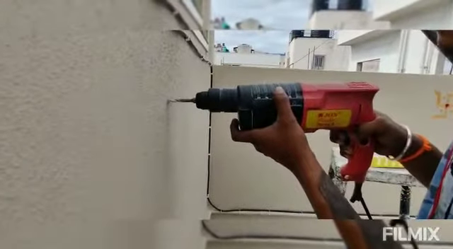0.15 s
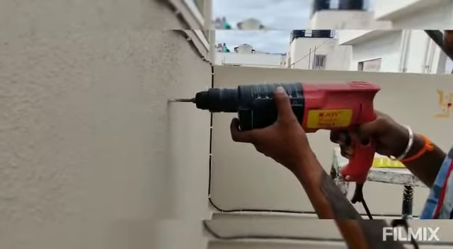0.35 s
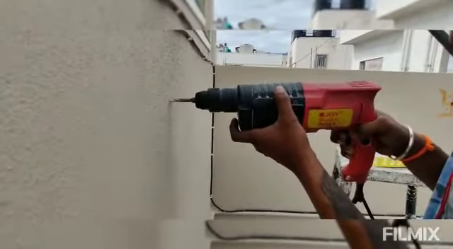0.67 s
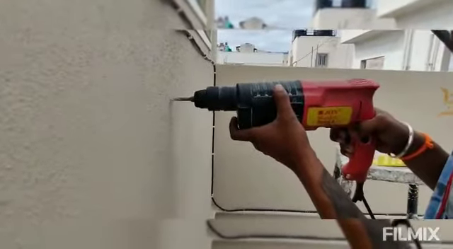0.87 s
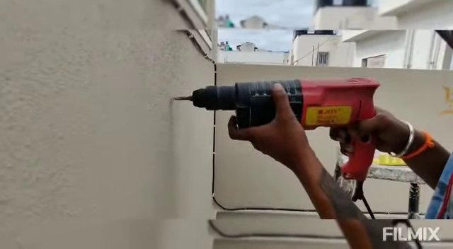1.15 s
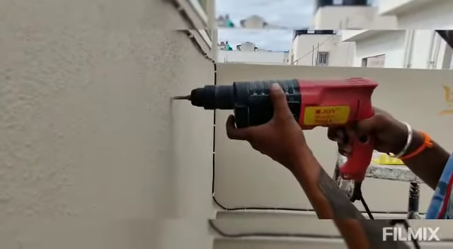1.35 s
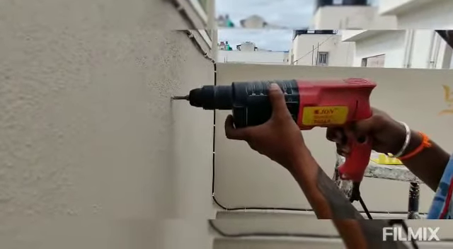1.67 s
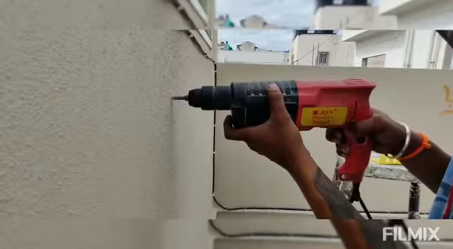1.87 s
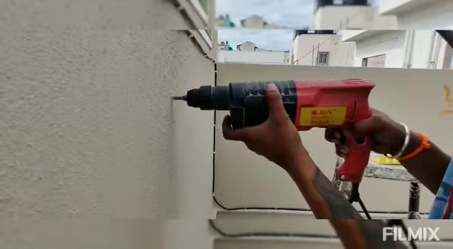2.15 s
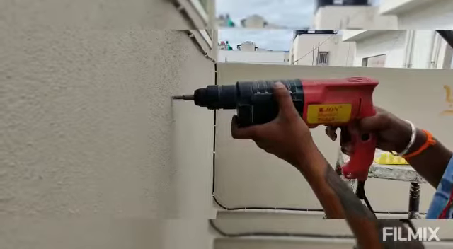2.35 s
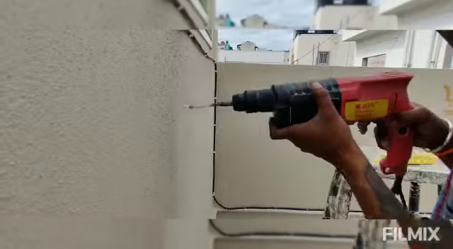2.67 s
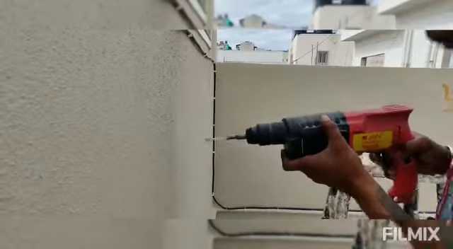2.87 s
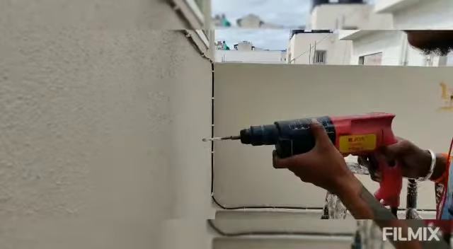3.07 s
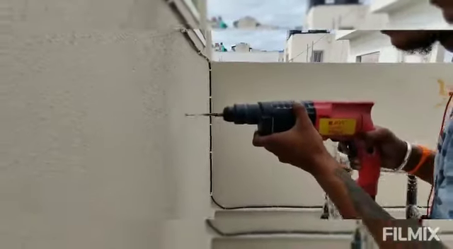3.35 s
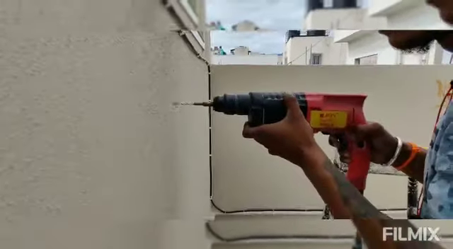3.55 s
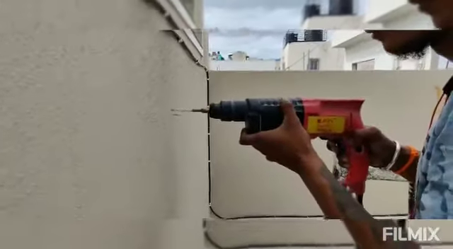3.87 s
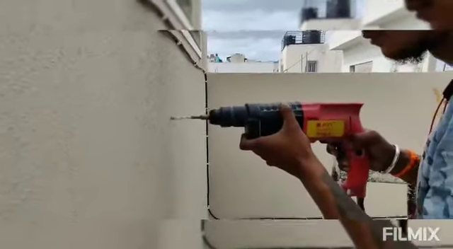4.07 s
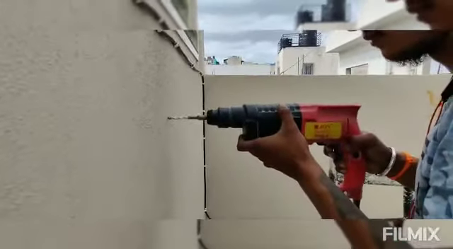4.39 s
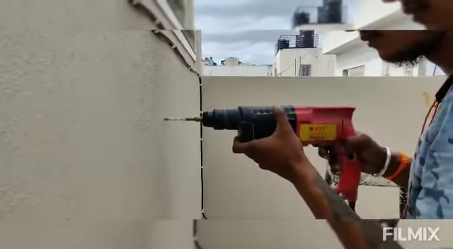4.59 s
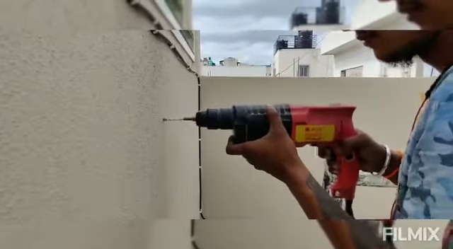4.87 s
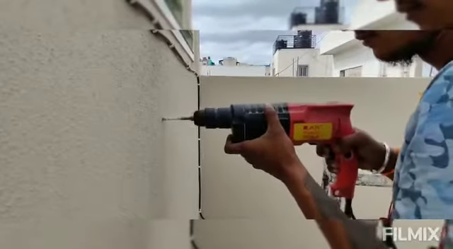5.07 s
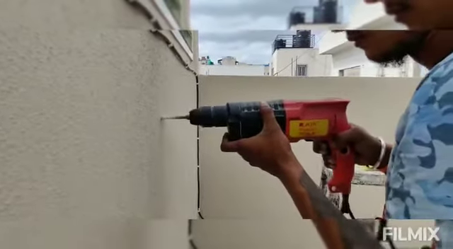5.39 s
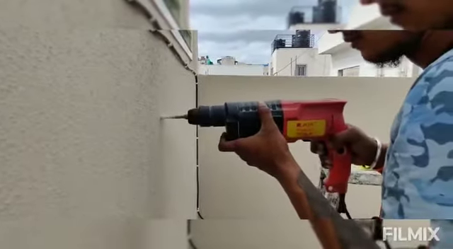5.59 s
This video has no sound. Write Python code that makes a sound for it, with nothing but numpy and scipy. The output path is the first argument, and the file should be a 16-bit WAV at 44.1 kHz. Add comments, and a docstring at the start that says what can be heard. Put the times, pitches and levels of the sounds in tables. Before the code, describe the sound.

A hammer drill hammers loudly into a masonry wall, pulls free and whines down to a stop, then revs up and drills again.

```python
"""A rotary hammer drill bores into a plastered masonry wall, between hard walls close to the microphone.
Blow impulses excite tool resonances, over gear tones, gear rasp and recoil; light air rumbles as filtered noise.
The tool is let go and pulled out; its whine glides down, the loose bit clinks, slack gears knock and it stops.
Then the trigger taps, the gears race up and a second hole begins.
One shaft speed times the blows, whine and slack knocks, and sets the loudness of the gears."""
import sys
import numpy as np
from scipy import signal
from scipy.fft import rfft, irfft, next_fast_len
from scipy.io import wavfile
from scipy.ndimage import uniform_filter1d, map_coordinates

SR = 44100
rng = np.random.default_rng(int(sys.argv[2]) if len(sys.argv) > 2 else 0)


def to_wav(s):
    """Save 16-bit WAV."""
    ch = np.atleast_2d(s).T  # columns
    pcm = np.round(np.clip(ch, -1, 1) * 32767)  # PCM
    wavfile.write(sys.argv[1], SR, pcm.astype(np.int16))


N = 252693
TIME = np.arange(N) / SR  # s

# the bit is on the wall (from s, until s, moment of one blow s)
DEEP_HOLE, FRESH_HOLE = (-1, 2.27, 2.2535), (4.745, 6, 4.7565)
FULL_RATE = 71  # reference shaft speed, turns (and blows) per second
STOP_S = 4.5  # the coast ends


def amp(db):
    """Level law: decibels to amplitude gain."""
    return 10 ** (np.asarray(db) / 20)


def unit(x):
    """Normalization: scale to rms 1."""
    return x / np.sqrt(np.mean(x ** 2) + 1e-20)


def along(points, hz):
    """Logarithmic interpolation: (f/Hz, value) points joined on a log-frequency axis."""
    f, v = np.transpose(points)
    return np.interp(np.log(hz + 1), np.log(f + 1), v)


def curves(rows):
    """Linear interpolation: one curve over time for each column after the time."""
    s, *columns = np.transpose(rows)
    return [np.interp(TIME, s, column) for column in columns]


def wobble(rate):
    """Band-limited chance: a smooth random curve with rate knots a second."""
    knots = rng.standard_normal(int(N * rate / SR) + 4)
    return map_coordinates(knots, [TIME * rate])


def swells(rows):
    """Gaussian envelopes: bell-shaped level changes in dB from rows of t/s, half length/s, change/dB."""
    return sum(db * np.exp(-((TIME - s) / length) ** 2) for s, length, db in rows)


def filtered(x, response):
    """Linear filtering: the spectrum of x times a response of frequency."""
    m = next_fast_len(N + 8192)
    return irfft(rfft(x, m) * response(np.fft.rfftfreq(m, 1 / SR)), m)[..., :N]


def below(hz, edge_hz, order=8):
    """Low-pass gain of Butterworth form."""
    return 1 / np.sqrt(1 + (hz / edge_hz) ** order)


def above(hz, edge_hz, order=8):
    """High-pass gain that complements the low-pass in power."""
    return np.sqrt(1 - below(hz, edge_hz, order=order) ** 2)


def noise():
    """Two independent white noises, for mid and side."""
    return rng.standard_normal((2, N))


def fade(t60):
    """Exponential decay: 60 dB in t60 seconds, cut after a quarter second."""
    return amp(-60 * TIME[:SR // 4] / t60)


def ring(x, response):
    """Superposition: convolve each row with an impulse response."""
    return signal.fftconvolve(np.atleast_2d(x), np.atleast_2d(response), axes=1)[:, :N]


def speed():
    """Drag law: turns per second when driven, coasting as a power of the time left, and driven again."""
    # first hole and the early part of the run-down: t/s, speed/turns per second
    first_run = [(0, 63.86), (.14, 68.52), (.35, 70.82), (1.16, 71.67), (1.3, 68.36), (1.58, 64.73),
                 (1.95, 63.66), (2.12, 64.15), (2.26, 51.76), (2.33, 50.8), (2.45, 47.8), (2.72, 40.6)]
    # new pull on the trigger: t/s, speed/turns per second
    second_run = [(4.698, 0), (4.75, 29.27), (4.82, 48.03), (4.92, 61.51), (5.02, 63.32), (5.2, 64.47),
                  (5.4, 70.03), (5.73, 71.21)]
    coast_power = 1.315  # friction and fan drag
    last_s = first_run[-1][0]
    left = np.clip((STOP_S - TIME) / (STOP_S - last_s), 0, 1)
    return curves(first_run)[0] * left ** coast_power + curves(second_run)[0]


def shaft():
    """Phase as the integral of speed: turns of the striker shaft so far."""
    return np.cumsum(speed()) / SR


def once_a_turn(moment):
    """Phase locking: samples at which the shaft stands as it does at the given moment."""
    turns = shaft()
    since = turns - np.interp(moment, TIME, turns)
    return np.flatnonzero(np.diff(np.floor(since)) > 0)


def octaves():
    """Logarithmic speed: octaves above the reference shaft speed."""
    return np.log2(speed() / FULL_RATE + 1e-6)


def strain():
    """Speed sag under load: how far the motor is below full speed, 0-1."""
    full_sag = 7  # turns per second lost under full strain
    return np.clip((FULL_RATE - speed()) / full_sag, 0, 1)


def surge():
    """Angular acceleration: how hard the motor is gaining speed, 0-1."""
    full_gain = 145  # turns per second, per second
    gain = np.gradient(speed()) * SR
    return uniform_filter1d(np.clip(gain / full_gain, 0, 1), SR // 50)


def turning():
    """Vanishing excitation: 1 while the gears run, falling to 0 as they creep to rest."""
    creep_rate = 4  # turns per second
    return np.clip(speed() / creep_rate, 0, 1) ** 2


def contact(*holes):
    """Contact coupling: how firmly the bit bears on the wall, 0-1."""
    bite_s = 0.024  # the bit takes hold or comes free
    return sum(np.clip(np.minimum(TIME - start, end - TIME) / bite_s + .5, 0, 1) for start, end, _ in holes)


def easing(hole):
    """Exponential approach: 1 as the bit meets or leaves the wall, towards 0 under full push."""
    ease_s = 0.12  # time constant of the hand leaning in and easing off
    start, end, _ = hole
    inside_s = np.maximum(np.minimum(TIME - start, end - TIME), 0)
    return np.exp(-inside_s / ease_s)


def walls(x, echo_db):
    """Comb filtering: nearby bare walls add weak copies delayed by 2 to 22 ms."""
    taps = np.zeros((2, SR // 20))
    for row in taps:
        delays = rng.integers(SR // 500, SR // 45, size=9)
        row[delays] = amp(echo_db) * rng.choice([-1, 1], size=9)
    return x + filtered(ring(x, taps), lambda hz: below(hz, 8200, order=6))


def radiate(force, colour, resonances, levels_db, share):
    """Forced resonance: colour a force by the tool's modes and set the level of three frequency registers."""
    def response(hz):
        lift = sum(db / (1 + (2 * (hz - centre) / width) ** 2) for centre, width, db in resonances)
        return amp(along(colour, hz) + lift)

    low, high = 1400, 7500  # register edges, Hz
    registers = [
        lambda hz: below(hz, low) ** 2,
        lambda hz: below(hz, high, order=20) ** 2 - below(hz, low) ** 2,
        lambda hz: above(hz, high, order=20) ** 2]
    sound = filtered(force, response)
    out = 0
    for register, db in zip(registers, levels_db):
        part = filtered(sound, register)
        active_rms = np.sqrt(np.average(part[0] ** 2, weights=share))
        out = out + amp(db) * part / active_rms
    return out * np.sqrt(share)


def hammer(hole, levels_db, eased_db, colour, resonances, knock_db, chatter_db, crack_db, repeat_hz, thud_db):
    """Impact excitation: one blow a turn; the wall knocks alike each time, the bit cracks and chatters afresh."""
    # brief level changes in the hammering: t/s, half length/s, change/dB
    lurches = [(.04, 0.018, -1.5), (.48, 0.075, -2.5), (1.0, 0.04, 0), (1.6, 0.018, -1.5),
               (1.69, 0.012, -4.5)]
    strain_levels_db = (-0.5, 0.15, 3.5)  # change under full strain: wall, housing, steel
    uneven_db, uneven_rate = .5, 24  # the masonry gives way unevenly: dB, changes per second
    jitter_s, sway_s = .00004, .00022  # blow timing: independent scatter, slow drift

    blow_at, turns = hole[-1], shaft()
    turns = turns - np.interp(blow_at, TIME, turns)
    at = once_a_turn(blow_at)
    chance = rng.standard_normal((len(at), 3))
    shift_s = chance[:, 0] * jitter_s + sway_s * wobble(14)[at]
    at = np.clip(at + np.round(shift_s * SR).astype(int), 0, N - 1)
    blow_db = 1.2 * chance[:, 1]
    blows = np.bincount(at, amp(blow_db), N)
    cracks = np.bincount(at, amp(blow_db + 2 * chance[:, 2]), N)

    # many close modes smear each blow in the same way
    smear = rfft(rng.standard_normal((2, SR // 4)) * (fade(0.013) + 0.24 * fade(0.11)))
    flattened = smear / np.abs(smear) ** .92
    knock = unit(ring(blows, irfft(flattened)))
    # the bit rebounds about three times between blows
    rebound = amp(1.2 * np.cos(2 * np.pi * 3 * turns) + 2.8 * wobble(300))
    chatter = noise() * ring(blows, fade(0.051) + fade(0.14)) * rebound
    chatter = unit(walls(chatter, echo_db=-14.0))
    crack = unit(noise() * ring(cracks, fade(.011) + .04 * fade(.06)))

    def chatter_colour(hz):
        return along([(200, 0.55), (700, 0.18), (1600, 0.88), (7000, 1), (10000, 0.57), (15000, 0.15)], hz)

    def crack_colour(hz):
        return along([(500, 0.24), (3000, 0.061), (7000, 0.25), (10000, 0.44), (14000, 0.89)], hz)

    force = amp(knock_db) * filtered(knock, lambda hz: below(hz, repeat_hz, order=3))
    force += amp(chatter_db) * filtered(chatter, chatter_colour)
    force += amp(crack_db) * filtered(crack, crack_colour)
    effort_db = uneven_db * wobble(uneven_rate) + swells(lurches)
    levels = [db + effort_db + strain_db * strain() + ease_db * easing(hole)
              for db, strain_db, ease_db in zip(levels_db, strain_levels_db, eased_db)]
    # strain changes the low thud of each blow
    thud = filtered(force, lambda hz: below(hz, 620) ** 2)
    force += (amp(thud_db * strain()) - 1) * thud
    force = filtered(force, lambda hz: above(hz, 207))
    return radiate(force, colour, resonances, levels, contact(hole))


def gears(mesh_db, shaft_db, grit_db, teeth_db, fan_db, fan_hz, fan_rate):
    """Amplitude modulation: gear, brush and fan noise pulses with the rotor and twice a turn with the shaft."""
    # colour of the free-running tool: f/Hz, level/dB per Hz
    colour = [(88, -54.5), (150, -23), (455, -13), (727, -4), (850, -11.5), (1050, -9), (2000, 8.5),
              (2210, 4.5), (3140, -2.5), (3740, -2), (5100, -5), (6700, -6), (8470, -21), (13500, -19.5),
              (15800, -29)]
    # its resonances: f/Hz, width/Hz, lift/dB
    resonances = [(674, 140, -1.5), (1060, 98, 5), (2090, 340, -7), (3187, 240, 6), (5800, 3600, -4.5),
                  (6760, 850, 6), (12000, 330, -7.5), (13800, 1300, 0)]
    # bass, middle, treble: level/dB at full speed, slope/dB per octave of speed,
    # change/dB while the bit is on the wall
    register_levels = [(-27, 11, -3), (-21, 7.5, -2.5), (-23.5, 10, -14)]

    turns, rate = shaft(), speed()
    rotor = 7 * turns
    pulse_db = mesh_db * np.cos(2 * np.pi * rotor) + shaft_db * np.cos(4 * np.pi * turns)
    rasp = amp(pulse_db + grit_db * wobble(700) + .7 * wobble(40))
    # the same small flaws of the pinion come round with every rotor turn
    flaws = rng.standard_normal((2, 64))
    teeth = np.array([map_coordinates(row, [rotor % 1 * len(row)], mode="grid-wrap") for row in flaws])
    teeth = amp(teeth_db + 4.6 * wobble(20)) * filtered(teeth, lambda hz: above(hz, 1580, order=4))
    # the cooling air in the vents weakens steeply below fan_rate turns per second
    vents = filtered(noise(), lambda hz: above(hz, fan_hz * 0.77, order=14) * below(hz, fan_hz * 1.13, order=20))
    fan = amp(fan_db) * np.clip(rate / fan_rate, 0, 1) ** 4 * vents
    force = walls((noise() + fan) * rasp + teeth, echo_db=-19.5)
    force = filtered(force, lambda hz: above(hz, 210))
    # the on-wall change is held back while the motor gains speed
    on_wall = contact(DEEP_HOLE, FRESH_HOLE) * (1 - surge())
    levels = [db + slope_db * octaves() + wall_db * on_wall for db, slope_db, wall_db in register_levels]
    return radiate(force, colour, resonances, levels, turning())


def gearcase(x):
    """Modal superposition: a force heard through resonances of the gear case, alternating in sign."""
    # modes: f/Hz, width/Hz, level/dB
    modes = [(1128, 150, -2.5), (1520, 190, -5), (1780, 170, -1), (2110, 200, 2), (2480, 240, -2),
             (3230, 200, -6)]

    def response(hz):
        total = 0
        for k, (centre, width, db) in enumerate(modes):
            damping = 1j * hz * width
            total = total + (-1) ** k * amp(db) * damping / (centre ** 2 - hz ** 2 + damping)
        return total

    return filtered(x, response)


def whirr(db, db_per_octave, tooth_db, uneven_db):
    """Friction excitation: tooth after tooth rubs through the gear case, outlasting the rasp as the shaft slows."""
    teeth = np.cos(2 * np.pi * 42 * shaft())
    rub = unit(gearcase(noise() * amp(tooth_db * teeth + uneven_db * wobble(90))))
    return rub * amp(db + db_per_octave * octaves()) * turning()


def whine(deep_db, fresh_db, strain_db, steepness, db_per_octave, flutter_db, drift):
    """Gear-mesh orders: tones of the loaded pinion follow the shaft, swell under heavy strain and flutter."""
    # gear tones under load: multiple of the blow rate, relative level/dB
    orders = [(13.8, -8.5), (41.2, -17), (41.67, 3.5), (41.6, -18), (62.7, -20), (78, -26.5)]
    chop_db = 4.5  # every blow jolts the gear mesh and breaks up its tone
    turns = shaft() + drift * wobble(35)
    deep = (1 - easing(DEEP_HOLE)) * amp(deep_db + strain_db * strain() ** steepness)
    loaded = deep + contact(FRESH_HOLE) * amp(fresh_db)
    loaded = loaded * amp(chop_db * (np.cos(2 * np.pi * turns) + .6 * wobble(200) - 1.5))
    tones = 0
    for multiple, db in orders:
        phase = multiple * turns + rng.random((2, 1))
        tones = tones + amp(db + flutter_db * wobble(45)) * np.sin(2 * np.pi * phase)
    return filtered(loaded * tones * amp(db_per_octave * octaves()), lambda hz: above(hz, 1100, order=6))


def recoil(deep_db, fresh_db, unsteady_db, sway):
    """Reaction force: the hammering piston shakes the tool at the lowest harmonics of the blow rate."""
    # harmonics 1, 2, 3, 4 in turn: relative level/dB, change under full strain/dB
    harmonics = [(-45.5, -6.5), (-47, 4.5), (-54.5, 9), (-56.5, -8)]
    turns, labour = shaft() + sway * wobble(14), strain()
    shake = 0
    for k, (db, strain_db) in enumerate(harmonics, 1):
        level_db = db + strain_db * labour + unsteady_db * wobble(19)
        shake = shake + amp(level_db) * np.sin(2 * np.pi * (k * turns + rng.random()))
    push = amp(deep_db) * (1 - easing(DEEP_HOLE)) ** 4 + amp(fresh_db) * (1 - easing(FRESH_HOLE))
    mid_only = np.array([[1], [0]])
    return np.sqrt(2) * shake * push * (speed() / FULL_RATE) ** 2 * mid_only


def air_and_floor(air_db, lumps_db, floor_db):
    """Turbulent pressure: air lumps against the microphone over a faint background floor."""
    # slow course of the air, before air_db: t/s, level/dB
    air_level = [(0, -43), (1.1, -46), (1.7, -48.5), (1.85, -55), (2.4, -53), (2.6, -52.5), (3.0, -57),
                 (3.2, -52), (3.7, -58), (3.9, -63), (4.2, -55.5), (4.5, -59.5), (4.65, -61), (5, -44),
                 (5.3, -47), (5.73, -45)]
    # puffs on top of it: t/s, half length/s, change/dB
    puffs = [(.14, 0.038, 6.5), (.78, 0.018, 6), (2.92, 0.028, 9), (4.15, 0.07, 10), (4.76, 0.029, 23.5),
             (5.59, 0.022, 16)]
    # colour of the air: f/Hz, level/dB per Hz
    air_colour = [(11, -40.5), (18, -3.5), (32, -11.5), (53, 0.5), (80, -4), (120, -10.5), (168, -22),
                  (230, -25), (290, -36.5), (480, -120)]
    # colour of the background floor, dull above about 4 kHz: f/Hz, level/dB per Hz
    floor_colour = [(59, -40), (100, -7), (196, -19.5), (222, -11), (1190, -21.5), (2470, -20.5),
                    (4350, -30.5), (5040, -44), (15000, -64.5)]
    level_db = curves(air_level)[0] + swells(puffs) + lumps_db * wobble(13)
    air = unit(filtered(noise(), lambda hz: amp(along(air_colour, hz)))) * amp(level_db + air_db)
    floor = unit(filtered(noise(), lambda hz: amp(along(floor_colour, hz))))
    return air + amp(floor_db) * floor


def band_swells(x):
    """Time-varying filtering: narrow bands of the drilling swell for a moment at given times."""
    # t/s, half length/s, f/Hz, width/Hz, lift/dB
    bands = [(.64, .1, 1050, 160, 4.3), (1.1, .2, 1700, 110.6, 7.1), (1.52, .07, 1730, 91, 5.1),
             (4.9, .06, 2450, 180, 4), (5.5, 0.3, 1120, 160, 1.9)]
    for s, length, centre, width, db in bands:
        band = filtered(x, lambda hz: np.exp(-(2 * (hz - centre) / width) ** 2))
        x = x + (amp(swells([(s, length, db)])) - 1) * band
    return x


def free_whine(coast_db, surge_db, db_per_octave, flutter_db, runout_db, drift):
    """Order tracking: gear tones glide with the shaft and swell as they cross the housing's resonances."""
    # gear tones: multiple of the shaft speed, relative level/dB
    orders = [(14, -4.5), (21, -5.5), (40, -9), (42, 1), (44.6, -10.5), (63, -3.5), (77, -1.5), (82, -3.5),
              (122.3, -1)]
    # response of the housing: f/Hz, level/dB
    housing = [(500, -11.5), (700, -6.5), (1000, -4), (1220, -15.5), (1450, -2), (2000, 1), (2400, -4.5),
               (2850, -4.5), (3200, 5), (3550, -11.5), (4600, -16), (6000, -32)]
    turns, tones = shaft(), 0
    for multiple, db in orders:
        runout = np.cos(2 * np.pi * (turns + rng.random()))
        level_db = db + flutter_db * wobble(30) + runout_db * runout
        phase = multiple * turns + drift * wobble(40) + rng.random((2, 1))
        tones = tones + amp(level_db) * np.sin(2 * np.pi * phase)
    running = amp(coast_db) * (1 - contact(DEEP_HOLE, FRESH_HOLE)) + amp(surge_db) * surge()
    return filtered(tones * running * amp(db_per_octave * octaves()), lambda hz: amp(along(housing, hz)))


def chuck(t60, attack_s):
    """Free vibration: the loose bit clinks, and rings out once more at the first blow on the fresh hole; each a
    bright tick and short ring of slightly varied pitch and colour."""
    # clinks of the loose bit, and last the first blow on the fresh hole: t/s, ring level/dB, treble level/dB
    clinks = [(2.476, -40, -16.5), (2.7166, -40, -18), (2.767, -45, -31), (2.9256, -38, -19.5),
              (3.092, -48, -26), (3.165, -48, -28), (3.5597, -48, -32), (3.6186, -47, -39),
              (3.6834, -50, -40), (3.7582, -50, -39), (3.9544, -44, -43), (4.091, -46, -31),
              (4.33, -44, -38.5), (4.372, -48, -59), (4.652, -43.5, -44), (4.7572, -30, -17)]
    # modes of bit and chuck: f/Hz, relative level/dB, t60/s
    modes = [(1760, -4, .035), (3350, -2, .05), (3660, -7, .025), (4230, -5, 0.028), (6700, -5, 0.05),
             (12060, -10, 0.1), (12100, -13, .07), (13630, -9, .03)]
    out, ticks, t = np.zeros((2, N + SR)), np.zeros(N), TIME[:SR // 4]
    attack = 1 - np.exp(-t / attack_s)
    for s, ring_db, treble_db in clinks:
        start = round(s * SR)
        pitch = 1 + rng.normal(0, .004)
        for hz, db, mode_t60 in modes:
            level_db = db + (treble_db if hz > 8000 else ring_db) + rng.normal(0, 2)
            tone = np.sin(2 * np.pi * (hz * pitch * t + rng.random((2, 1))))
            out[:, start:start + len(t)] += amp(level_db) * fade(mode_t60) * tone * attack
        ticks[start] = amp(treble_db)
    burst = noise() * ring(ticks, (fade(t60) + .08 * fade(.15)) * attack)

    def tick_colour(hz):
        return along([(1500, .2), (4500, 0.38), (10000, 0.55), (13000, 1.3), (15500, .7)], hz)

    return out[:, :N] + filtered(burst, tick_colour)


def slack_knocks(scatter_db):
    """Backlash impacts: one knock a turn late in the coast, softer as it slows; rows of t/s, peak/dB before mixing."""
    knock_at_s, fastest = 3.7996, 21  # moment of one knock; turns per second below which they knock
    top_db, db_per_octave = -14.5, 7  # peak at the fastest rate; fall with speed
    rate, rows = speed(), []
    for i in once_a_turn(knock_at_s):
        if rate[i] < fastest and TIME[i] < STOP_S:
            db = top_db + db_per_octave * np.log2(rate[i] / fastest)
            rows.append((TIME[i], db + scatter_db * rng.normal()))
    return rows


def slack(knock_db, tick_db, rebound_s, rebound_db):
    """Impact and rebound: slack gears knock with a small tick and rebound once, dully, inside the gear case."""
    # single jolts besides the knocks of each turn: t/s, peak/dB before mixing
    jolts = [(4.09, -26), (4.722, -17.5)]
    first, second = np.zeros(N), np.zeros(N)
    for s, db in slack_knocks(scatter_db=-0.5) + jolts:
        first[round(s * SR)] = amp(db)
        second[round((s + rebound_s) * SR)] = amp(db + rebound_db)
    knock = gearcase(noise() * ring(first + second, fade(0.0335) + 0.19 * fade(0.25)))

    def tick_colour(hz):
        return along([(300, .1), (600, .6), (1500, .4), (4500, 0.77), (8000, 0.66), (11000, 0.55),
                      (15500, 0.31)], hz)

    tick = filtered(noise() * ring(first, fade(0.047) + 0.121 * fade(.16)), tick_colour)
    return amp(knock_db) * knock + amp(tick_db) * tick


def trigger(at, db, t60):
    """Damped impact: the plastic trigger bottoms out in the grip with a dull tap."""
    since = np.maximum(TIME - at, 0)
    tap = unit(filtered(noise(), lambda hz: above(hz, 254, order=4) * below(hz, 2100, order=6)))
    return tap * amp(db - 60 * since / t60) * (1 - np.exp(-since / .003))


def ports(mid, side):
    """Partial coherence: two ports share most of some bands, less of others, slightly out of step."""
    # left-right likeness: f/Hz, likeness/0-1
    alike = [(100, .95), (210, 0.9), (330, 0.4), (520, 0.96), (770, 0.85), (1170, 0.42), (1800, 0.68),
             (2700, 0.77), (4200, 0.4), (6400, 0.18), (10000, 0.62), (14000, 0.32)]
    # phase by which left leads: f/Hz, lead/rad
    left_lead = [(300, 0.33), (500, -0.21), (800, 0.54), (1200, 0.24), (1700, -1.1), (2400, 0.42),
                 (3200, -0.07), (4200, 1), (6000, -0.021)]
    # left minus right: f/Hz, level/dB
    left_lean = [(60, -1), (110, 1.5), (200, -0.5), (380, 0), (700, 1), (1290, 2.5), (2380, 1.0),
                 (4400, 1.5), (8120, 0.0), (15000, 0)]
    sign = np.array([[1], [-1]])

    def unlike(hz):
        return np.tan(np.arccos(np.clip(along(alike, hz), 0, 1)) / 2)

    def port_response(hz):
        half_lead = np.clip(along(left_lead, hz), -2, 2) / 2
        return amp(sign * along(left_lean, hz) / 2) * np.exp(1j * sign * half_lead) / np.cos(half_lead)

    return filtered(mid + sign * filtered(side, unlike), port_response)


def scene():
    """Superposition of sources: both holes, the running gear, small knocks and the air."""
    # colours of the deep and fresh hole: f/Hz, level/dB per Hz
    deep_colour = [(88, -46.5), (150, -3.5), (244, -17.5), (483, -13.5), (699, -4), (850, -9.5), (1030, -1),
                   (1330, -4), (1680, -2), (2630, 2.5), (4810, -16), (6700, -13.5), (8310, -27),
                   (14300, -22), (15800, -29)]
    fresh_colour = [(88, -43), (150, -8.5), (382, -26), (474, -9.5), (634, -8), (850, 3), (1090, 2),
                    (1330, -3.5), (2250, 0.5), (2480, -6.5), (3390, -10.5), (6450, -6), (8470, -25),
                    (14100, -18), (15800, -19)]
    # resonances standing out of each: f/Hz, width/Hz, lift/dB
    deep_resonances = [(556, 62, 4.5), (618, 36, 4.5), (790, 110, 5.5), (1183, 170, 2.5), (1698, 46, 8.5),
                       (1830, 39, 7.5), (2680, 120, -2), (4230, 290, 6), (6770, 450, 9), (8220, 710, -22.5),
                       (12250, 390, 4.5)]
    fresh_resonances = [(630, 94, 7.5), (845, 160, -8.5), (1160, 200, 1.5), (1320, 100, -4.5),
                        (1480, 77, 4), (1806, 120, 4.5), (2498, 160, 12), (3160, 37, -16), (4940, 60, 3.5),
                        (6700, 700, -3), (8170, 1100, -7), (12300, 400, -8)]
    # levels run: wall, housing, steel; eased_db is the change with hardly any push
    drill = hammer(DEEP_HOLE, (-23.5, -21, -32), (-6, -2.5, 0), deep_colour, deep_resonances,
                   knock_db=0.0, chatter_db=1.5, crack_db=-1.5, repeat_hz=1463, thud_db=-5.5)
    drill += hammer(FRESH_HOLE, (-24.5, -22.5, -31), (-13, -7, -1), fresh_colour, fresh_resonances,
                    knock_db=2.5, chatter_db=2.0, crack_db=-2.5, repeat_hz=1610, thud_db=5)
    drill = band_swells(drill)
    drill += gears(mesh_db=0.0, shaft_db=-0.1, grit_db=2.5, teeth_db=-14, fan_db=3.5, fan_hz=2850, fan_rate=34)
    drill += whirr(db=-41, db_per_octave=2.2, tooth_db=3, uneven_db=3.5)
    drill += whine(deep_db=-28.0, fresh_db=-34.5, strain_db=13.5, steepness=5.3,
                   db_per_octave=23.5, flutter_db=2.5, drift=0.0016)
    drill += recoil(deep_db=0.5, fresh_db=-2.0, unsteady_db=3.2, sway=0.039)
    drill += free_whine(coast_db=-27.5, surge_db=-22, db_per_octave=12.5, flutter_db=3.0, runout_db=3, drift=.12)
    air = air_and_floor(air_db=2.0, lumps_db=2.5, floor_db=-60.0)
    knocks = chuck(t60=0.04, attack_s=.0008)
    knocks += slack(knock_db=-2.0, tick_db=-9.5, rebound_s=.012, rebound_db=-3)
    knocks += trigger(at=4.676, db=-38.5, t60=0.17)
    mid, side = drill + knocks + air
    return ports(mid, side)


def record(dry):
    """Saturation and band limiting: the highest peaks are rounded off, then the top of the band is cut."""
    rounded = dry / (1 + np.abs(dry / .95) ** 6) ** (1 / 6)
    return filtered(rounded, lambda hz: below(hz, 15800, order=400))


dry = scene()
out = record(dry)
to_wav(out)
```